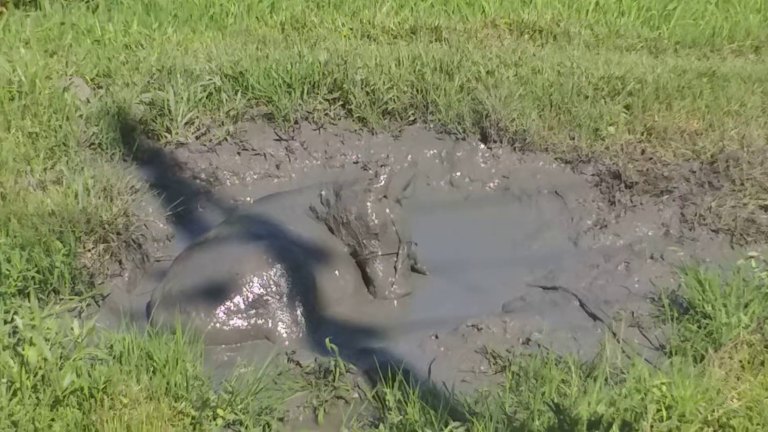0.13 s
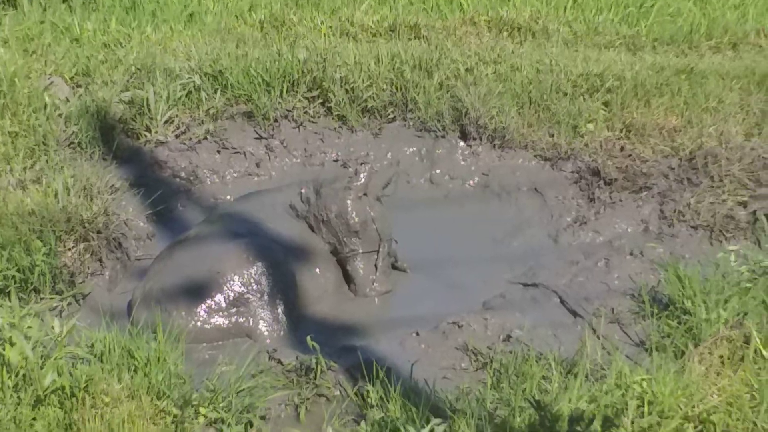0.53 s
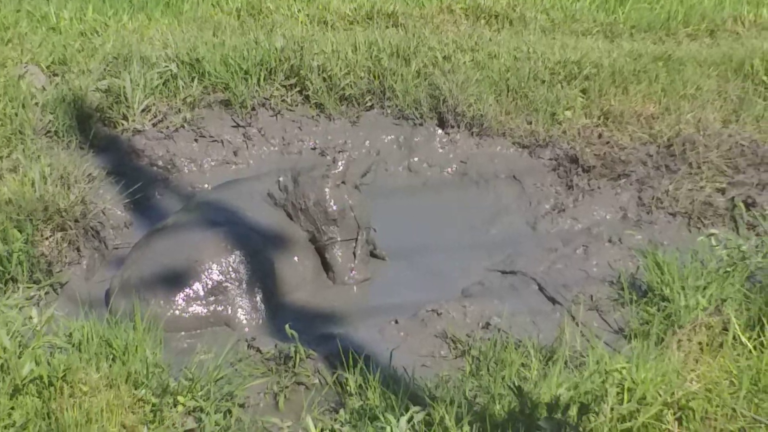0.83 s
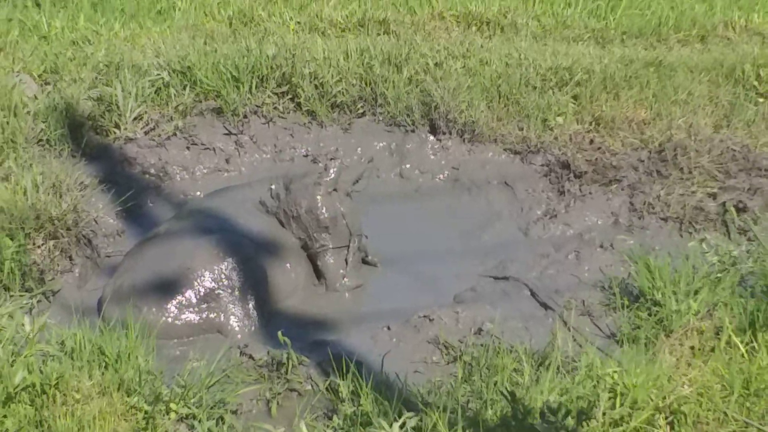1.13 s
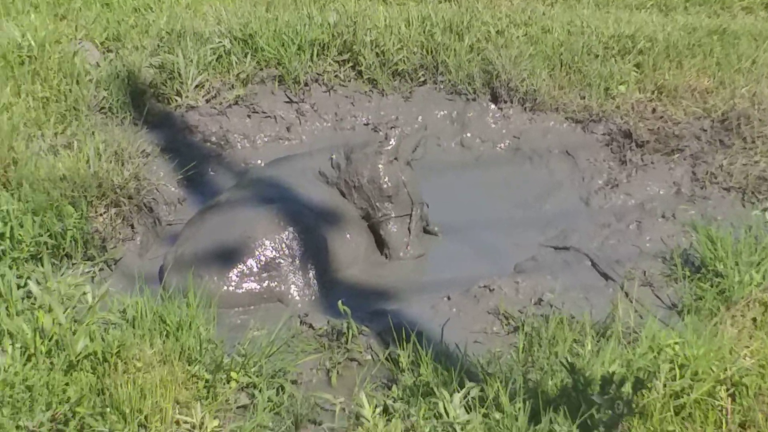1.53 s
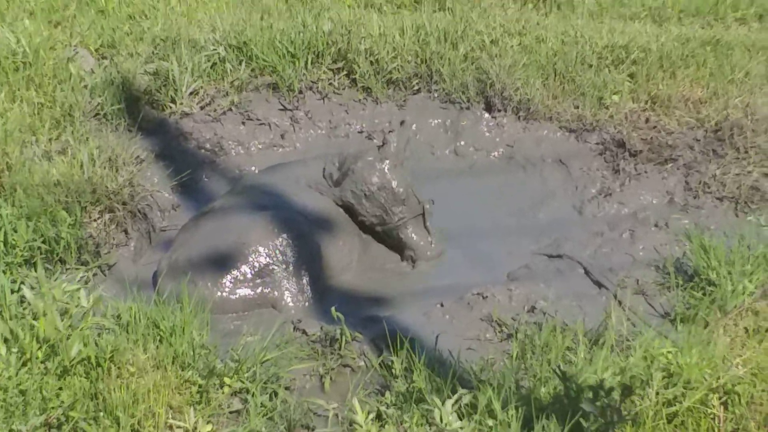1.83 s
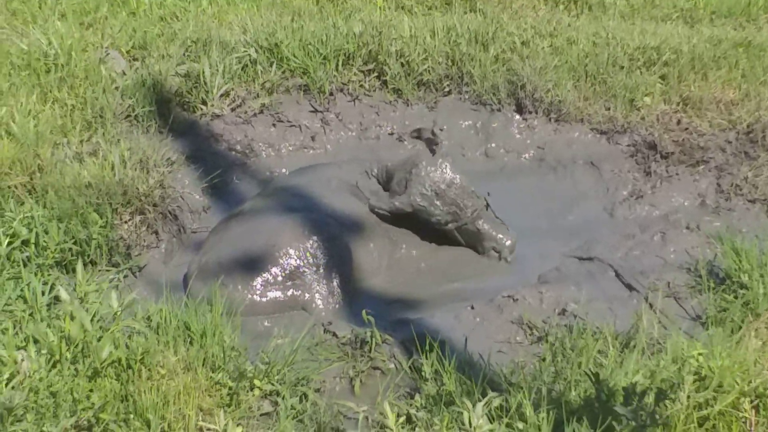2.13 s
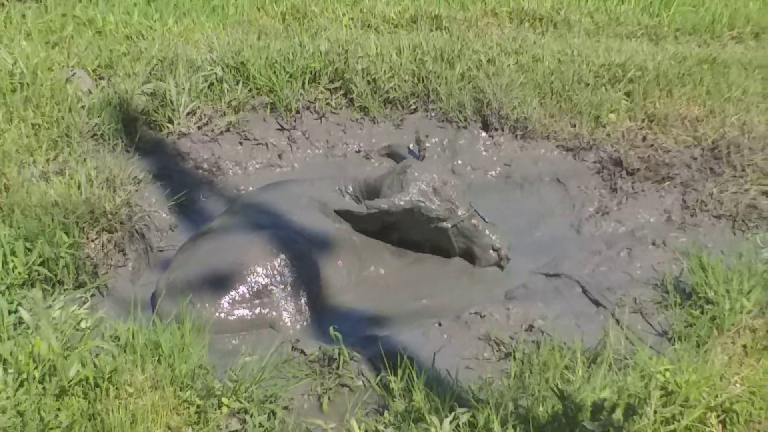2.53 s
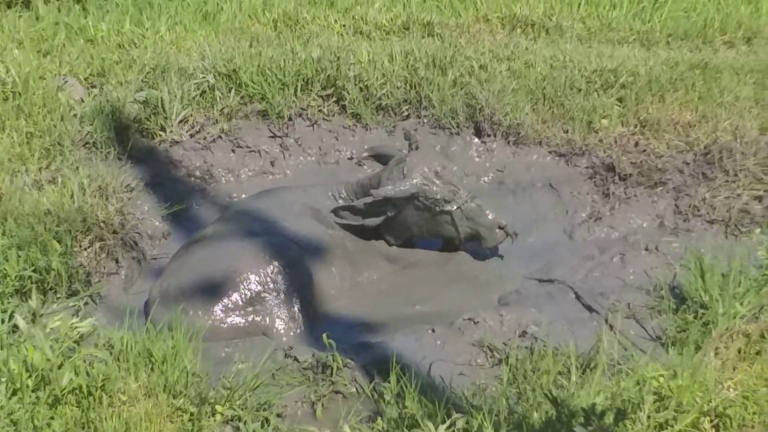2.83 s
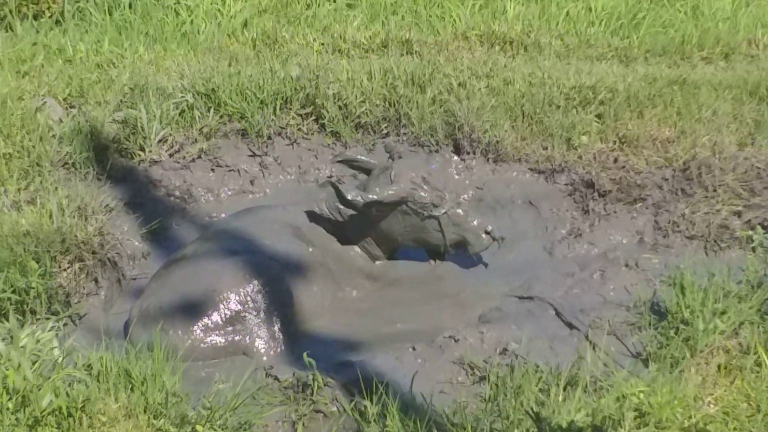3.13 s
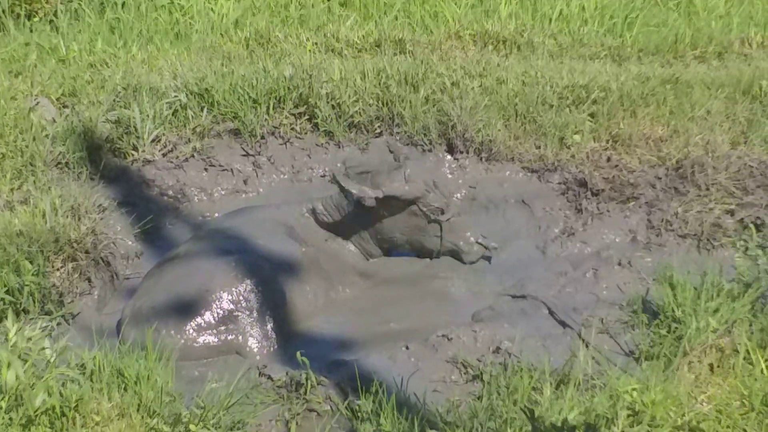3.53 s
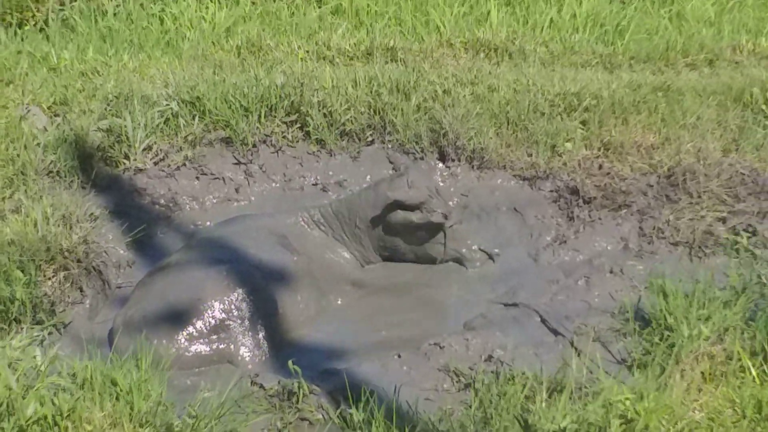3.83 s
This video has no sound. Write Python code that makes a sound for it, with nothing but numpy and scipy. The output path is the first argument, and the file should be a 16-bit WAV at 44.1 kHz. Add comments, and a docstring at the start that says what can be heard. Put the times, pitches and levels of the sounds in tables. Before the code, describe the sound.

Wind buffets the microphone in low, uneven puffs from the start, easing to a lull around 1 second. At about 1.5 seconds the hardest gusts hit, thudding, slapping and crackling until just past 2 seconds, then weaker puffs continue to 4 seconds. Far behind are a soft insect hiss, a faint cricket trill in the first second, and tiny bird chirps near the start and around 3 seconds.

```python
"""Gusty wind buffets a small camera's microphone in a meadow beside a buffalo wallow.
Each puff is a swarm of eddies, each eddy a brief swing of pressure: broad ones thud and throb,
small ones sputter, the hardest slap, crackle and drive the input into its limiter.
Far behind, a cricket trills with its wings and a small bird chips over the hiss of the meadow."""
import sys
import numpy as np
from scipy import signal
from scipy.fft import rfft, irfft
from scipy.io import wavfile
from scipy.ndimage import uniform_filter1d, minimum_filter1d

SR = 44100
rng = np.random.default_rng(int(sys.argv[2]) if len(sys.argv) > 2 else 0)


def dump(signal):
    """Clip the signal to [-1, 1] and save it as 16-bit WAV at the path in sys.argv[1]."""
    limited = np.clip(np.atleast_2d(signal).T, -1, 1)
    pcm = np.round(limited * 32767).astype(np.int16)
    wavfile.write(sys.argv[1], SR, pcm)


N = 176400  # 4 s

SLAP_ROUNDNESS, THUD_ROUNDNESS, SPUTTER_ROUNDNESS = 2.48, 1.66, 2.88  # higher = less cusp, more swing


def undb(db):
    """Decibels to linear gain."""
    return 10 ** (np.asarray(db) / 20)


def curve(rows):
    """Straight lines in time through (seconds, value) rows."""
    return np.interp(np.arange(N) / SR, *np.array(rows, float).T)


def colour(x, points):
    """Equalise along a curve of (Hz, dB) points."""
    hz, db = np.array(points, float).T
    bin_hz = np.linspace(1, SR / 2, N // 2 + 1)
    return irfft(rfft(x) * undb(np.interp(np.log(bin_hz), np.log(hz), db)), N)


def low_cut(x, hz, order):
    """Roll off the bass."""
    return signal.sosfilt(signal.butter(order, hz, "high", fs=SR, output="sos"), x)


def pressure_pulses(times, sizes, sharp_hz, lean, roundness, half_samples=300):
    """One swing of pressure per eddy: sharpness sets its pitch range, lean (in turns) skews it."""
    offsets = np.arange(-half_samples, half_samples + 1)
    u = 2 * np.pi * sharp_hz[:, None] * offsets / SR / roundness  # time in pulse widths
    swing = np.cos(2 * np.pi * lean[:, None] - roundness * np.arctan(u))
    shape = (1 + u * u) ** (-roundness / 2) * swing
    pulses = sizes[:, None] * shape * np.hanning(len(offsets))
    slots = np.clip((times * SR).astype(int)[:, None] + offsets + 1, 0, N + 1)
    pressure = np.bincount(slots.ravel(), pulses.ravel(), N + 2)[1:-1]
    return low_cut(pressure, hz=108.5, order=3)  # the microphone's bass roll-off


def with_wake(times, sizes, sharp_hz, lean, roundness, followers, wake_db):
    """Eddies and the weaker, blunter followers that they shed a moment later."""
    spacing_s, dulling = 0.001193, 0.94
    out = pressure_pulses(times, sizes, sharp_hz, lean, roundness)
    for _ in range(followers):
        gap, lean = rng.random((4000, 2))[:len(times)].T
        times = times + spacing_s * (.5 + gap)
        sizes, sharp_hz = sizes * undb(wake_db), sharp_hz * dulling
        out += pressure_pulses(times, sizes, sharp_hz, lean, roundness, half_samples=200)
    return out


def eddies(envelope, sharp_hz, per_s, roundness, followers=0):
    """A random stream of eddies riding the envelope; harder wind makes them smaller and sharper."""
    sharpen_oct_per_db, pivot_db = 0.1074, -27.5
    size_spread_db, sharp_spread_oct = 7, 0.4
    jitter, lean = rng.random((4000, 2)).T
    size_scatter, sharp_scatter = rng.standard_normal((4000, 2)).T
    times = (np.arange(len(jitter)) + 2 * jitter - 1) / per_s
    heard = (times >= 0) & (times < (N - 1) / SR)
    wind_db = 20 * np.log10(envelope[(times[heard] * SR).astype(int)] + 1e-3)
    octaves = sharpen_oct_per_db * (wind_db - pivot_db) + sharp_spread_oct * sharp_scatter[heard]
    hz = sharp_hz * 2 ** octaves
    sizes = undb(size_spread_db * size_scatter[heard])
    swarm = with_wake(times[heard], sizes, hz, lean[heard], roundness, followers, wake_db=-1)
    power = uniform_filter1d(uniform_filter1d(swarm * swarm, 900), 900)
    shaped = envelope * swarm / np.sqrt(np.abs(power) + 1e-9)  # the envelope alone sets the level
    return low_cut(shaped, hz=45, order=2)


def wind():
    """Puffs hit the microphone, hold and drop away, thudding and sputtering over a low breeze."""
    # Puffs of wind. Each row: start in seconds, length in seconds, thud level in dB, sputter level in dB.
    puffs = [(0, 0.044, -19.5, -27.5), (0.046, 0.078, -18, -26), (0.112, 0.056, -19, -26),
             (0.175, 0.065, -21.5, -26), (0.254, 0.028, -17, -26.5), (0.308, 0.03, -17.5, -37),
             (0.392, 0.037, -19.5, -29), (0.695, 0.021, -19.5, -49), (0.735, 0.038, -20.5, -26),
             (0.786, 0.015, -16, -39), (0.963, 0.052, -28.5, -46), (1.422, 0.071, -14.5, -26.5),
             (1.466, 0.12, -15, -21), (1.593, 0.055, -13, -19), (1.662, 0.062, -16.5, -19),
             (1.728, 0.091, -20.5, -22), (1.822, 0.063, -12.5, -21.5), (1.905, 0.099, -13, -19.5),
             (2.013, 0.033, -23, -18.5), (2.081, 0.027, -17, -28.5), (2.146, 0.015, -18, -19),
             (2.206, 0.016, -19.5, -21.5), (2.231, 0.021, -15, -21.5), (2.271, 0.051, -22, -23),
             (2.363, 0.049, -18.5, -25), (2.423, 0.065, -19.5, -28.5), (2.556, 0.038, -21, -29),
             (2.595, 0.032, -25.5, -25), (2.635, 0.069, -19, -35.5), (2.709, 0.055, -26, -32),
             (2.791, 0.05, -19.5, -27), (2.848, 0.059, -20, -23.5), (2.919, 0.019, -18.5, -26),
             (2.951, 0.097, -28, -32), (3.094, 0.045, -21.5, -24.5), (3.21, 0.074, -23, -25.5),
             (3.329, 0.075, -15.5, -23), (3.421, 0.077, -24.5, -33), (3.583, 0.042, -19, -26),
             (3.623, 0.055, -19, -21), (3.684, 0.069, -22, -25.5), (3.842, 0.047, -24, -40),
             (3.902, 0.041, -15.5, -33.5), (3.959, 0.044, -19.5, -25.5)]
    # The low flutter between puffs. Each row: time in seconds, level in dB.
    breeze_levels = [(0, -25), (.42, -22.5), (.53, -47.5), (.58, -32), (.62, -40), (.8, -31), (.91, -40),
                     (1.1, -43), (1.31, -56), (1.36, -33), (1.405, -50), (1.45, -17.5), (2.0, -25),
                     (2.47, -36), (2.525, -39), (2.58, -34.5), (3.0, -29.5), (3.07, -31.5), (3.17, -25),
                     (3.48, -30.5), (3.56, -44), (3.79, -29), (4.0, -39.5)]
    attack_s, release_s, puff_gain_db = 0.0064, 0.012, 0.5
    t = np.arange(N) / SR
    thud_level, sputter_level = np.zeros(N), np.zeros(N)
    for start, length, thud_db, sputter_db in puffs:
        rise = np.clip((t - start) / attack_s + .5, 0, 1)
        fall = np.exp(-np.maximum(t - start - length + release_s / 2, 0) / release_s)
        gate = rise * fall
        thud_level = np.maximum(thud_level, undb(thud_db) * gate)
        sputter_level = np.maximum(sputter_level, undb(sputter_db) * gate ** 2)
    thud = eddies(thud_level, sharp_hz=208, per_s=480, roundness=THUD_ROUNDNESS)
    sputter = eddies(sputter_level, sharp_hz=680, per_s=260, roundness=SPUTTER_ROUNDNESS, followers=2)
    breeze = eddies(undb(curve(breeze_levels)), sharp_hz=151, per_s=600, roundness=THUD_ROUNDNESS)
    return undb(puff_gain_db) * (thud + sputter) + breeze


def cricket():
    """Even trills of wing strokes, each stroke falling in pitch."""
    # Bouts of trilling. Each row: start in seconds, end in seconds, level in dB.
    bouts = [(-.052, 1.27, -67.5), (2.873, 4.0, -82.5)]
    period_s, trill_s, strokes_per_s = .1115, .089, 135
    top_hz, fall_hz = 9460, 920
    t, out = np.arange(N) / SR, np.zeros(N)
    for start, end, db in bouts:
        since = (t - start) % period_s
        stroke = since * strokes_per_s % 1
        waver_hz = 900 * uniform_filter1d(rng.standard_normal(N), size=60)
        hz = top_hz - fall_hz * stroke + waver_hz
        gate = uniform_filter1d(1. * (t > start) * (t < end) * (since < trill_s), size=150)
        out += 2 * undb(db) * gate * np.sin(np.pi * stroke) * np.sin(2 * np.pi * np.cumsum(hz) / SR)
    return out


def meadow():
    """Smooth, distant hiss of insects and grass."""
    # The tone of the hiss. Each row: frequency in Hz, relative level in dB.
    hiss_eq = [(300, 3.5), (900, -8.5), (1800, -6), (2080, -1), (2350, -4), (2600, -13), (3050, -10),
               (4300, -7.5), (5000, -12.5), (5800, -19.5), (7700, -13.5), (9300, -23.5), (10200, -43)]
    # Level of the background hiss: it ducks after the hardest buffets, then slowly recovers.
    # Each row: time in seconds, level in dB.
    hiss_levels = [(0, -52), (.8, -54.5), (1.38, -49), (2.4, -59), (3.15, -58), (4.0, -53)]
    hiss = colour(rng.standard_normal(N), hiss_eq)
    return hiss / hiss.std() * undb(curve(hiss_levels))


def slaps():
    """Single hard eddies: a sharp edge riding on a round plop."""
    # Hits on the microphone. Each row: time in seconds, edge level in dB, sharpness in Hz.
    hits = [(0.063, 2, 1080), (0.068, -6.5, 1090), (0.1947, -6.5, 1130), (0.2228, -4, 1130),
            (0.397, -13.5, 664), (0.702, -11.5, 1600), (0.746, -8.5, 1270), (0.7932, -17, 1080),
            (0.991, -13.5, 634), (1.456, -13.5, 2060), (1.4779, 5.5, 2200), (1.4966, -11, 1390),
            (1.5166, -2, 1420), (1.5246, 4, 1300), (1.5309, 4, 1130), (1.5375, 2, 1270), (1.5494, 1, 1310),
            (1.5586, -2, 1005), (1.5699, -5, 1100), (1.5805, 10.5, 1690), (1.5994, 7, 1470),
            (1.603, 4, 1130), (1.6133, 7.5, 1480), (1.629, -5, 1030), (1.6655, -4, 1470), (1.6902, 7, 1310),
            (1.6993, -8, 1270), (1.7085, -3.5, 1695), (1.7415, 1, 1590), (1.785, -2, 1300),
            (1.8444, -6, 1740), (1.8799, 0, 1340), (1.9124, -1.5, 1840), (1.935, 0, 1480), (1.947, 3, 1260),
            (1.9657, -8, 1430), (1.974, 1.5, 2130), (2.0282, 9.5, 2150), (2.0342, -5, 1300),
            (2.152, -7, 1300), (2.2405, -9, 1540), (2.3066, 0, 1410), (2.3737, -0.5, 900),
            (2.3862, -8.5, 1280), (2.574, -12, 1050), (2.6806, -9, 865), (2.829, -4.5, 650),
            (2.925, -17, 1045), (3.109, -9.5, 1140), (3.2602, -11, 1355), (3.3515, -5, 1530),
            (3.3622, -6, 1490), (3.3718, -7.5, 1160), (3.6668, -7.5, 1100), (3.6869, -10, 1010),
            (3.9131, -3, 750), (3.9218, -9.5, 890), (3.9333, -3, 830), (3.966, -6, 690)]
    times, db, sharp_hz = np.array(hits, float).T
    sizes, lean = undb(db), rng.random(len(times))
    edge = with_wake(times, sizes, sharp_hz, lean, SLAP_ROUNDNESS, followers=1, wake_db=-5.5)
    plop_sizes = np.sqrt(sizes) * undb(-6.5)  # harder hits are more edge than plop
    plop_hz = np.full(len(times), 357)
    return edge + pressure_pulses(times, plop_sizes, plop_hz, lean, SPUTTER_ROUNDNESS)


def bird():
    """Short whistles that slide down in pitch and are blurred by the grass."""
    # The bird's chips. Each row: start in seconds, level in dB.
    chips = [(.114, -57), (.146, -52), (.177, -50.5), (.312, -58), (0.34, -54), (.372, -52), (2.982, -60),
             (3.012, -56.5), (3.043, -57.5), (3.208, -55.5), (3.237, -56), (3.404, -56), (3.435, -56)]
    chip_s, start_hz, end_hz = 0.03, 5280, 4100
    echo_decay_s, echo_db = 0.0078, 3
    t, whistles = np.arange(N) / SR, np.zeros(N)
    for start, db in chips:
        progress = np.clip((t - start) / chip_s, 0, 1)
        hz = end_hz + (start_hz - end_hz) * np.cos(np.pi / 2 * progress) ** 2
        envelope = 2 * np.sqrt(progress) * (1 - progress)
        whistles += undb(db) * envelope * np.sin(2 * np.pi * np.cumsum(hz) / SR)
    tail = rng.standard_normal(N) * np.exp(-np.minimum(t / echo_decay_s, 20))
    echo = signal.fftconvolve(whistles, tail / np.linalg.norm(tail))[:N]
    return whistles + undb(echo_db) * echo


def throbs():
    """Broad eddies that swell and die within a few cycles."""
    # Deep, hollow throbs. Each row: centre in seconds, pitch in Hz, peak level in dB.
    swells = [(.749, 199, -21), (.794, 130, -13), (1.463, 183, -3.5), (1.858, 224, -7.5), (3.245, 167, -11),
              (3.373, 252.5, -9)]
    half_width_s = 0.0069
    t, out = np.arange(N) / SR, np.zeros(N)
    for centre, hz, db in swells:
        envelope = np.exp(-np.minimum(((t - centre) / half_width_s) ** 2, 20))
        out += undb(db) * envelope * np.sin(2 * np.pi * (hz * (t - centre) + rng.random()))
    return out


def crackle():
    """Grainy treble on top of the hardest buffets."""
    # Tiny snaps and short sprays. Each row: centre in seconds, half-length in seconds, level in dB.
    snaps = [(1.4788, 0.00038, -21), (1.518, 0.00043, -22), (1.6137, 0.00038, -15), (1.667, 0.00042, -23.5),
             (1.6905, 0.0016, -32), (1.711, 0.0009, -22.5), (1.742, 0.00047, -24), (1.87, 0.0078, -45),
             (1.934, 0.0093, -37), (1.951, 0.00049, -25), (1.974, .0015, -24.5), (2.026, 0.0015, -23.5),
             (2.2412, .0004, -30.5), (2.303, .001, -37.5), (2.3867, 0.00027, -30), (3.354, 0.00055, -32),
             (3.362, .003, -39.5)]
    # The bite of the grains. Each row: frequency in Hz, relative level in dB.
    grain_eq = [(500, -18), (2500, 11.5), (7500, -8.5), (10500, -26)]
    t = np.arange(N) / SR
    gate = sum(undb(db) * np.exp(-np.minimum(np.abs(t - at) / half, 20)) for at, half, db in snaps)
    noise = rng.standard_normal(N)
    clicks = np.sign(noise) * (np.abs(noise) > 2)
    grains = colour(clicks, grain_eq)
    return gate * grains / grains.std()


def scene():
    """Wind and meadow, nearly mono: the microphone's two ports differ a little above the bass."""
    # Stereo width. Each row: frequency in Hz, level sent to the side signal in dB.
    width_eq = [(100, -58), (550, -40), (1000, -20), (1800, -14), (4000, -22), (9000, -18)]
    mid = slaps() + throbs() + wind() + crackle() + bird() + cricket() + meadow()
    send = colour(mid, width_eq)
    side = .4 * send + .8 * np.imag(signal.hilbert(send))  # mostly a quarter cycle out of phase
    return np.array([mid + side, mid - side])


def record(dry):
    """A fast limiter pulls the hardest slaps down to about its ceiling; the top is cut."""
    ceiling, hold_s, top_hz = .97, .001, 16000
    hold = int(hold_s * SR)
    needed_gain = np.minimum(1, ceiling / (np.abs(dry).max(axis=0) + 1e-9))
    gain = uniform_filter1d(minimum_filter1d(needed_gain, hold), hold)
    return signal.sosfilt(signal.ellip(8, .2, 70, top_hz, fs=SR, output="sos"), dry * gain)


dry = scene()
out = record(dry)
dump(out)
```